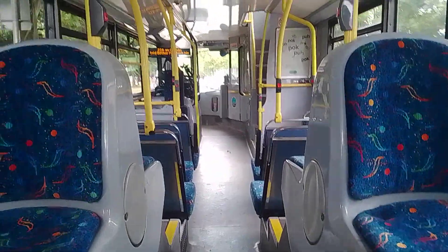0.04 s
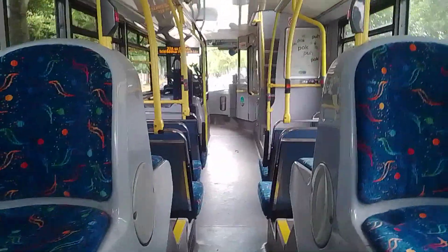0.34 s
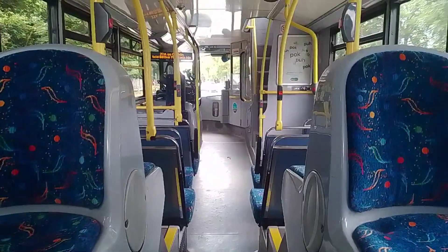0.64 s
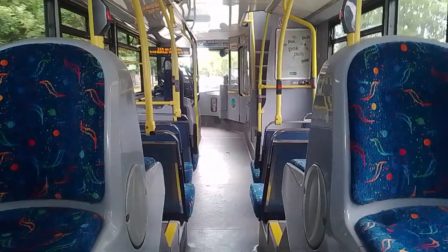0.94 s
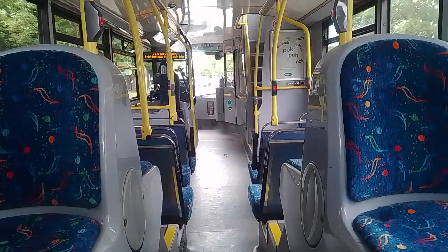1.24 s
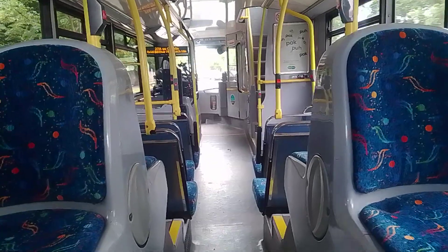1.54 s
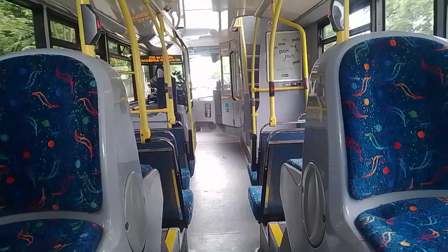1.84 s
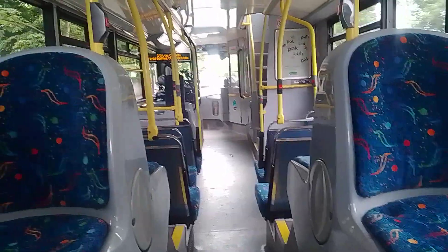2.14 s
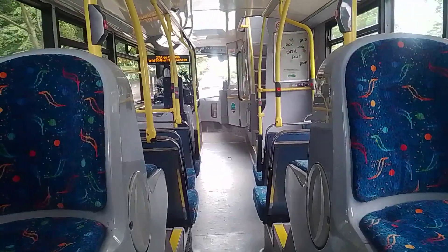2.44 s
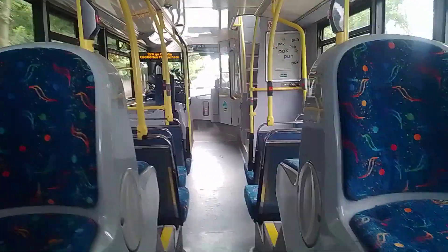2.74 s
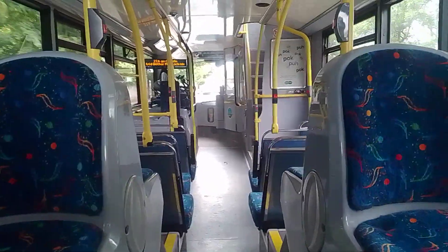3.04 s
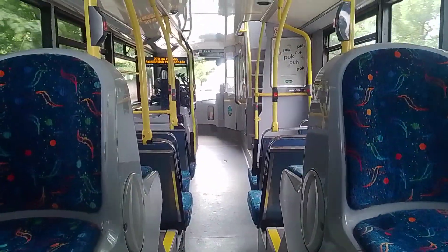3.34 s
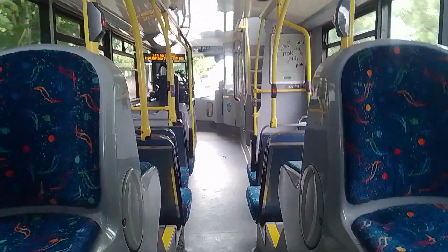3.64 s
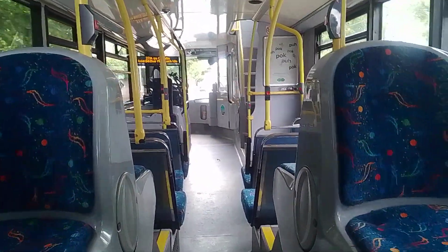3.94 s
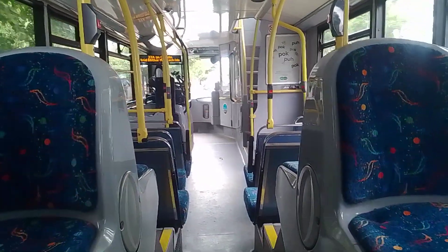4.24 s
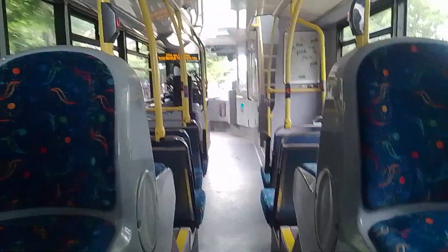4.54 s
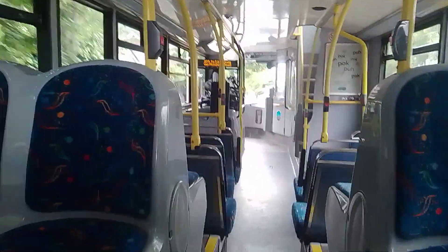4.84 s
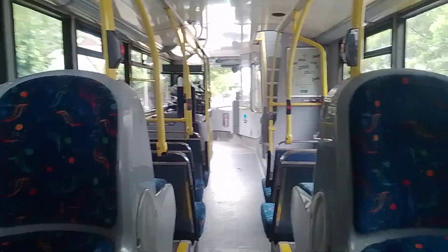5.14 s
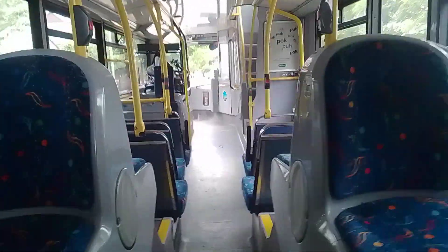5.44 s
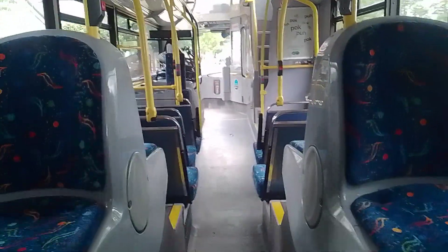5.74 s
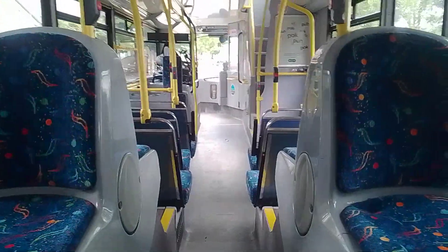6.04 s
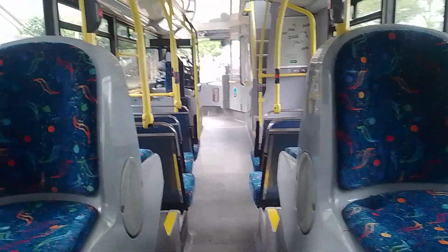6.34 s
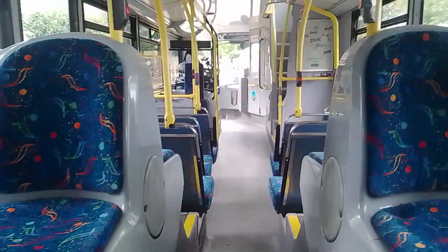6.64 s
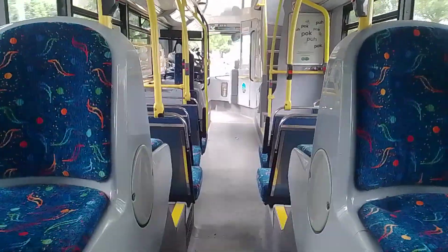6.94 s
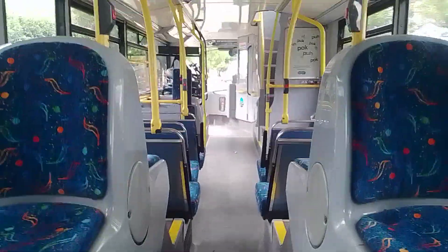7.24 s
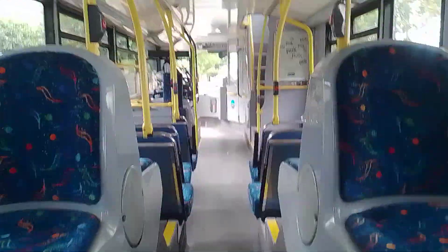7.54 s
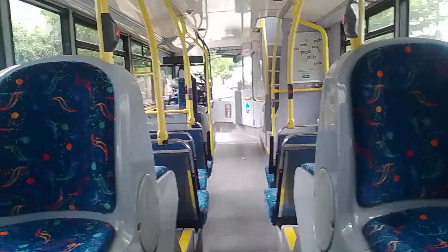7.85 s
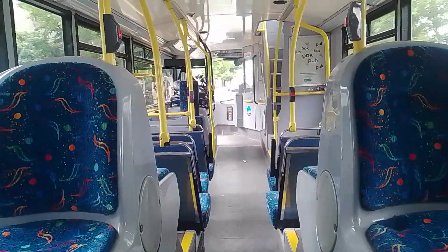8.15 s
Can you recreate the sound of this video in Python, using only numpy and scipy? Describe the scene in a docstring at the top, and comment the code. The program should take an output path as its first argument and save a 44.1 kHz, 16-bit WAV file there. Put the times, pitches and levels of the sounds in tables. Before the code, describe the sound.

Inside a moving bus, a deep engine boom and road rumble, with bumps thudding and seats and poles rattling.

```python
"""Rear seats of a moving city bus

Engine and road excite a deep resonance of the cabin air, with tyre roar and a faint driveline whine
above it. Bumps thud through the body; impacts set seats, poles and panels rattling, and fittings
tick and squeak. The heaviest jolts overload the microphone."""
import sys
import numpy as np
from scipy import signal
from scipy.fft import rfft, irfft
from scipy.io import wavfile
from scipy.ndimage import uniform_filter1d

SR = 44100
rng = np.random.default_rng(int(sys.argv[2]) if len(sys.argv) > 2 else 0)


def digitize_waveform(pressure):
    """Quantize a signal to 16-bit integers and store it at the path in sys.argv[1].

    Rows of a 2-D input are taken as channels; values are limited to [-1, 1].
    """
    field = np.atleast_2d(pressure).T
    bounded = np.clip(field, -1, 1)
    quanta = np.round(bounded * 32767).astype(np.int16)
    wavfile.write(sys.argv[1], SR, quanta)


N = 365588
T = np.arange(N) / SR

# engine running: t/s, firing rate/Hz, load gain/dB
ENGINE_RUN = [(0, 43.1, -9), (.6, 43.51, -6), (1.1, 46.38, 4.5), (1.6, 47.1, 3), (1.9, 46.17, 0),
              (2.25, 41.38, -1.5), (3.0, 39.58, 1.5), (3.4, 40.06, -3), (3.9, 42.19, -3), (4.5, 42.41, 4),
              (5.0, 43.49, -1.5), (5.9, 43.81, -5), (6.6, 44.33, 0), (7.4, 45.11, -5), (7.85, 42.24, 2.5),
              (8.29, 40.48, -1.5)]
# engine harmonics: multiple of the firing rate, level/dB
ENGINE_ORDERS = [(1, -23.5), (2, -23), (3, -41), (4, -46)]
# slow trend of the cabin boom: t/s, level/dB
BOOM_TREND = [(0, -12.5), (.6, -13), (1.05, -13), (1.35, -13.5), (1.65, -9.5), (1.95, -12.5), (2.4, -11.5),
              (2.62, -8), (2.8, -11.5), (3.35, -10.5), (3.5, -12), (4.3, -14), (4.7, -12), (5.15, -15),
              (5.6, -13), (6.1, -15), (7.5, -14), (8.29, -15)]
# the boom's beat against the engine: t/s, amplitude ratio/1
BEAT_DEPTH = [(4.6, 0.01), (4.85, 0.64), (5.65, 0.36), (5.9, 0.85), (6.4, 0.88), (6.65, 0.02)]
# the boom surging as the body flexes: peak t/s, level/dB
BOOM_SURGES = [(.12, -13), (0.769, -9), (1.55, -6), (3.358, -8), (4.76, -12.5), (6.21, -10), (6.33, -12),
               (6.53, -18), (6.67, -2.5), (6.87, -7), (7.09, -8), (7.73, -10.5), (7.97, -14), (8.25, -6.5)]
# the body rocking on uneven road: peak t/s, level/dB, rise time constant/s
JOLTS = [(.27, -50.5, 0.041), (.51, -39.5, 0.055), (.97, -42.5, 0.078), (1.69, -33, 0.16),
         (2.04, -44, 0.036), (2.8, -29.5, 0.12), (2.92, -32.5, 0.11), (3.06, -36.5, 0.087),
         (3.47, -44.5, 0.13), (3.68, -38, 0.12), (3.99, -44.5, 0.097), (4.31, -44, .025),
         (4.57, -33, 0.078), (4.7, -36.5, 0.078), (4.87, -36, 0.084), (5.654, -32.5, 0.15),
         (5.93, -48, 0.036), (6.23, -41.5, 0.068), (6.46, -40, 0.15), (6.97, -44, 0.037),
         (7.17, -45.5, 0.054), (7.3, -40, 0.035), (7.56, -41.5, .03), (8.16, -49.5, 0.072)]
# shaking between jolts: t/s, level/dB
TREMOR = [(0, -48.5), (1.2, -54.5), (4.2, -52.5), (5.35, -53.5), (6.8, -51.5), (7.6, -55), (7.78, -65),
          (8.0, -50)]
# tyre roar on smooth road: t/s, relative level/dB
ROAD_TREND = [(0, -43.5), (1.6, -43), (2.3, -44.5), (3.6, -43), (6.0, -44), (6.4, -42.5), (7.05, -45),
              (7.55, -43), (7.9, -45.5)]
# tyre roar spectrum: f/Hz, density/dB
ROAD_SPECTRUM = [(12, -3), (25, 4), (40, -0.5), (62, 7.5), (105, 8), (150, 1.5), (200, -10), (300, -14.5),
                 (450, -18.5), (650, -22.5), (1000, -28), (1800, -36.5), (2400, -35.5), (3500, -41.5),
                 (16000, -58)]
# driveline whine: t/s, f/Hz, relative level/dB
DRIVELINE_WHINE = [(0, 507, -38), (.7, 521.3, -44.5), (1.6, 513, -44), (2.4, 513.9, -49.5),
                   (3.4, 514, -46.5), (4.2, 512, -51.5), (4.9, 524.3, -42.5), (6, 509.5, -46),
                   (7.3, 530, -44.5), (8.29, 517.7, -47.5)]
# faint gear tone: t/s, f/Hz, relative level/dB
GEAR_TONE = [(0, 1480, -73), (2.1, 1487, -71.5), (2.4, 1464, -59), (3.4, 1474, -62), (4, 1477, -68.5),
             (7.95, 1487, -67), (8.1, 1480, -55.5), (8.29, 1476, -55)]
# a panel humming with the engine: t/s, f/Hz, relative level/dB
PANEL_HUM = [(0, 172, -35), (.3, 172, -29), (.65, 171, -31.5), (.95, 170, -63), (1.4, 171, -40),
             (1.85, 171, -27), (2.2, 168, -66)]
# response of the plastic trim: f/Hz, gain/dB
TRIM_RESPONSE = [(400, -28), (1200, -14), (2500, -8), (3300, -7), (4200, -4), (5400, -4.5), (6500, 0),
                 (7600, 3), (8700, 5.5), (9500, -5.5), (10400, -8), (11300, -16), (13000, -27.5),
                 (15800, -32)]
# modes of poles and seat frames: f/Hz, bandwidth/Hz, gain/dB
FRAME_MODES = [(2440, 31, -9), (4090, 25, -5), (5240, 31, -5), (5930, 30, -9), (6300, 27, 1.5),
               (6570, 16, -9.5), (7240, 24, -4), (7200, 33, -11), (7450, 12, -14), (7830, 26, 3),
               (8740, 30, -13), (8730, 64, -1), (9160, 17, 3), (9400, 35, -0.5), (9780, 45, -11.5),
               (10140, 75, -7), (10650, 32, -16), (11600, 35, -15)]
# loose fittings knocking: t/s, relative level/dB
KNOCKS = [(.251, -30.5), (.403, -32), (.456, -28.5), (.503, -28), (0.862, -33), (.954, -29), (1.365, -42),
          (1.43, -29.5), (1.497, -26.5), (1.997, -28.5), (2.339, -29), (2.585, -31), (2.67, -42),
          (2.717, -19), (2.999, -31), (3.219, -26), (3.7, -26), (3.863, -27), (3.945, -31), (3.999, -31),
          (4.289, -29), (4.387, -27), (4.535, -31), (4.657, -22), (5.291, -31), (6.2, -25.5),
          (6.275, -26.5), (6.334, -25), (6.441, -23.5), (6.983, -29), (7.141, -24.5), (7.244, -24.5),
          (7.509, -24)]
# dry ticks: t/s, relative level/dB, edge relative to the tap/dB
TICKS = [(0.458, -29.5, -23), (3.867, -31, -11), (4.482, -28, -21), (4.511, -37, -15), (4.819, -41, -2),
         (5.291, -30, -8), (5.299, -30.5, -6), (5.456, -26.5, -13), (5.85, -50, -13), (5.862, -37, 1),
         (5.884, -33, -7), (6.16, -31.5, -17), (7.479, -31, -21), (7.521, -33, -18), (7.571, -28.5, -17),
         (7.66, -32.5, -19), (7.972, -35.5, -18), (8.044, -29, -17), (8.139, -32.5, -21), (8.232, -39, -20)]
# sharp edge of a hard contact: f/Hz, gain/dB
EDGE_RESPONSE = [(3000, -26), (9000, -2), (12500, -1.5), (15800, -8)]
# trim squeaks: t/s, duration/s, f/Hz, level/dB
SQUEAKS = [(1.679, 0.43, 9000, -50.5), (4.815, 0.035, 8480, -35), (4.818, 0.12, 9000, -45),
           (7.594, 0.038, 9170, -44)]
# response of the heavy panels: f/Hz, gain/dB
PANEL_RESPONSE = [(200, -16), (700, -3), (1500, 5.5), (2700, -3.5), (4500, -3), (7000, -10.5),
                  (15800, -20.5)]
# wheels hitting bumps: t/s, duration/s, thud/dB, body heave/dB, kick to the boom/dB
BUMPS = [(2.691, 0.095, -17.5, -11, -6.5), (2.856, 0.148, -26.5, -20, 2), (3.099, 0.046, -39, -24, -4.5),
         (3.582, 0.062, -22, -11, -8.5), (4.515, 0.06, -27, -16, -2.5), (4.591, 0.085, -24.5, -10.5, -2),
         (5.488, 0.126, -21.5, -20.5, -1.54)]


def undb(db):
    """Amplitude ratio of a level in decibels."""
    return 10 ** (np.asarray(db) / 20)


def unit(x):
    """Normalisation to rms 1."""
    return x / np.sqrt(np.mean(x ** 2) + 1e-18)


def curve(table):
    """Linear interpolation of each column of a time table."""
    times, *columns = np.transpose(table)
    return [np.interp(T, times, column) for column in columns]


def shaped(x, response):
    """Filtering by a response of (f/Hz, gain/dB) points, joined in log frequency."""
    hz, db = np.transpose(response)
    bin_hz = np.maximum(np.arange(len(x) // 2 + 1) * SR / len(x), 1)
    gain = undb(np.interp(np.log(bin_hz), np.log(hz), db))
    return irfft(rfft(x) * gain, len(x))


def resonance(x, hz, width_hz):
    """A damped oscillator: two poles, gain 1 at resonance."""
    return signal.lfilter(*signal.iirpeak(hz, hz / width_hz, fs=SR), x)


def noise():
    """Gaussian white noise."""
    return rng.standard_normal(N)


def walk(rate):
    """Smooth random fluctuation of rms 1, changing about rate times a second."""
    hold = max(int(SR / rate), 1)
    steps = np.repeat(rng.standard_normal(N // hold + 1), hold)
    return unit(uniform_filter1d(uniform_filter1d(steps, hold), hold)[:N])


def tone(hz):
    """A sinusoid of rms 1 whose phase is the integral of frequency."""
    return np.sqrt(2) * np.sin(2 * np.pi * (np.cumsum(hz) / SR + rng.random()))


def swell(start, length):
    """A half-sine envelope."""
    return np.sin(np.pi * np.clip((T - start) / length, 0, 1))


def contacts(per_s, scatter_db):
    """A Poisson train of tiny impacts of uneven strength."""
    impulses = (rng.random(N) < per_s / SR) * np.sign(noise())
    return unit(impulses * undb(scatter_db * np.clip(noise(), -2, 2)))


def cabin(force, t60, wet_db):
    """Reverberation: reflections off windows and panels give each contact a diffuse tail."""
    retention = np.exp(-np.log(10 ** 6) / (t60 * SR))
    energy = signal.lfilter([1 - retention], [1, -retention], force ** 2)
    tail = np.sqrt(energy) * noise()
    wet = undb(wet_db)
    return (force + wet * tail) / np.hypot(1, wet)


def engine():
    """Periodic firing gives a harmonic series; only its lowest orders pass through the floor."""
    firing_hz, load_db = curve(ENGINE_RUN)
    firing_hz = firing_hz * (1 + 0.0067 * walk(12))
    return sum(tone(order * firing_hz) * undb(db + load_db + 2.2 * walk(11))
               for order, db in ENGINE_ORDERS)


def boom_level(beat_hz=3.9, lull_s=6.4, surge_s=0.1037):
    """Interference with the engine makes the boom beat; surges add in power. Level in dB."""
    trend_db, = curve(BOOM_TREND)
    depth, = curve(BEAT_DEPTH)
    beat = 1 - 2 * depth / (1 + depth ** 2) * np.cos(2 * np.pi * beat_hz * (T - lull_s))
    throb = undb(trend_db + 1.5 * walk(20))
    surges = sum(undb(db) * swell(peak - surge_s / 2, surge_s) for peak, db in BOOM_SURGES)
    return 10 * np.log10(beat * throb ** 2 + surges ** 2)


def boom(mode_hz=80, sag_db_per_s=23.5):
    """Resonance of the cabin air, pulled toward the engine's second order and kicked by bumps."""
    db = boom_level()
    firing_hz, _ = curve(ENGINE_RUN)
    centre_hz = mode_hz + .3 * (2 * firing_hz - mode_hz)
    kick = sum(np.sqrt(swell(start, length)) * undb(kick_db - sag_db_per_s * np.maximum(T - start, 0))
               for start, length, _, _, kick_db in BUMPS)
    # weak swings and hard kicks both unsettle the pitch
    wander_hz = np.minimum(2.9 * undb(-db - 10), 12) + 1.48 * kick
    # the throb is capped so that it stays below overload between bumps
    swing_db = np.minimum(db - .7 + 2.0 * walk(55), -8.5)
    return tone(centre_hz + wander_hz * walk(60)) * np.hypot(undb(swing_db), kick)


def shaking(settle_s=0.13):
    """Damped body vibration: jolts grow and decay exponentially over a tremor. Level in dB."""
    tremor_db, = curve(TREMOR)
    power = undb(tremor_db) ** 2
    for peak, db, rise_s in JOLTS:
        envelope = np.exp(-np.maximum((peak - T) / rise_s, (T - peak) / settle_s))
        power += (undb(db) * envelope) ** 2
    return 10 * np.log10(power)


def tyre_roar(shake_db):
    """Structure-borne noise swells with each jolt; road texture modulates two bands separately."""
    low_pass = signal.butter(2, 350, fs=SR, output="sos")
    band_pass = signal.butter(2, [350, 10000], "band", fs=SR, output="sos")
    low = signal.sosfilt(low_pass, unit(shaped(noise(), ROAD_SPECTRUM)))
    high = signal.sosfilt(band_pass, unit(shaped(noise(), ROAD_SPECTRUM)))
    smooth_db, = curve(ROAD_TREND)
    db = 20 * np.log10(np.hypot(undb(smooth_db), undb(shake_db - 6.5)))
    usual_db = np.median(db)
    low *= undb(0.75 * (db - usual_db) + 0.56 * walk(22))
    high *= undb(1.1 * (db - usual_db) + 0.4 * walk(25))
    return undb(usual_db + 21.5) * (low + high)


def machine_tone(table, wander, flutter_db):
    """Forced vibration of a shaken part: a tone with random frequency and amplitude modulation."""
    hz, db = curve(table)
    return tone(hz * (1 + wander * walk(60))) * undb(db - 2.0 + flutter_db * walk(28))


def fittings(force, ring_db):
    """Contact forces radiate through bright plastic trim and the normal modes of metal frames."""
    ring = sum(undb(db) * resonance(force, hz, width) for hz, width, db in FRAME_MODES)
    return shaped(force, TRIM_RESPONSE) + undb(ring_db) * ring


def rattles(shake_db, chatter_s=0.019):
    """Impact excitation: shaken parts buzz together; knocked ones chatter with exponential decay."""
    buzz_force = contacts(1400, scatter_db=3.0) * undb(shake_db + 2.2 + 1.1 * walk(55))
    buzz = cabin(buzz_force, t60=.09, wet_db=-1.5)
    knocks = np.zeros(N)
    for onset, db in KNOCKS:
        start = int(onset * SR)
        knocks[start:] += undb(db - 11.5) * np.exp(-T[:N - start] / chatter_s)
    chatter = cabin(knocks * contacts(2500, scatter_db=3.5), t60=.2, wet_db=-5.0)
    return fittings(buzz, ring_db=-3) + fittings(chatter, ring_db=11)


def ticks(decay_s=0.0031):
    """A brief impact has a broad spectrum: a nearby fitting taps once, sharper on hard contact."""
    taps, edges = np.zeros((2, N))
    for onset, db, edge_db in TICKS:
        start = int(onset * SR)
        tap = undb(db + 1.0) * np.exp(-T[:N - start] / decay_s)
        taps[start:] += tap
        edges[start:] += tap * undb(edge_db + 1.0)
    sharp = shaped(cabin(edges * noise(), t60=.1, wet_db=-8), EDGE_RESPONSE)
    force = cabin(taps * noise(), t60=0.11, wet_db=-4.0)
    return fittings(force, ring_db=-14) + sharp


def squeaks(width_hz=260):
    """Friction between trim pieces gives a thin, rough squeak of narrow-band noise."""
    sound = np.zeros(N)
    for start, length, hz, db in SQUEAKS:
        band = resonance(resonance(noise(), hz, width_hz), hz, width_hz)
        sound += swell(start, length) * undb(db) * unit(band)
    return sound


def rattle_edge(shake_db):
    """Harder contacts carry more treble: the rattle's bright edge grows faster than the shaking."""
    force = contacts(1400, scatter_db=3.0) * undb(-40.5 + 1.6 * (shake_db - shake_db.max()))
    return shaped(cabin(force, t60=.08, wet_db=-1.5), EDGE_RESPONSE)


def panel_clatter(shake_db):
    """Impacts of heavy panels on their stops, prominent only in hard shaking."""
    force = contacts(260, scatter_db=3.0) * undb(-35.0 + 0.91 * (shake_db - shake_db.max()))
    return shaped(cabin(force, t60=.1, wet_db=4.0), PANEL_RESPONSE)


def bumps():
    """A mass on springs: each bump heaves the body on its suspension and drums the floor panels."""
    floor_response = [(50, -16), (130, 5.5), (260, -12.5), (450, -22.5),
                      (900, -30.0), (2500, -39), (16000, -95)]
    thud = unit(shaped(noise(), floor_response))
    heave = unit(resonance(resonance(noise(), hz=26.3, width_hz=22), hz=27.8, width_hz=28))
    return sum(swell(start, length) * (undb(thud_db) * thud + undb(heave_db) * heave)
               for start, length, thud_db, heave_db, _ in BUMPS)


def pole_clink(start_s=2.717, hz=4400, peak_db=-30, t60=.045):
    """Free vibration: a pole strikes its bracket and rings in one damped mode."""
    age = np.maximum(T - start_s, 0)
    return undb(peak_db - 60 * age / t60) * np.sin(2 * np.pi * hz * age)


def scene():
    """Superposition of all sources at the rear seats."""
    shake_db = shaking()
    driveline = machine_tone(DRIVELINE_WHINE, wander=0.01214, flutter_db=1.9)
    driveline += machine_tone(GEAR_TONE, wander=.003, flutter_db=2.5)
    rumble = engine() + boom() + tyre_roar(shake_db) + bumps()
    hum = machine_tone(PANEL_HUM, wander=0.012, flutter_db=-3.0)
    rattling = rattles(shake_db) + rattle_edge(shake_db) + panel_clatter(shake_db)
    return (rumble + hum + driveline + rattling + ticks() + squeaks() + pole_clink())[None]


def record(dry, ceiling=.708, fade_s=.004, cutoff_hz=15800):
    """Saturation: the microphone flattens the boom's peaks and chops the rattle; a low-pass follows."""
    clipped = dry / (1 + np.abs(dry / ceiling) ** 30) ** (1 / 30)
    from_ends_s = np.minimum(T, T[-1] - T)
    fade = np.sin(np.pi / 2 * np.minimum(from_ends_s / fade_s, 1)) ** 2
    low_pass = signal.ellip(10, .1, 80, cutoff_hz, fs=SR, output="sos")
    return signal.sosfilt(low_pass, clipped * fade)


dry = scene()
out = record(dry)
digitize_waveform(out)
```